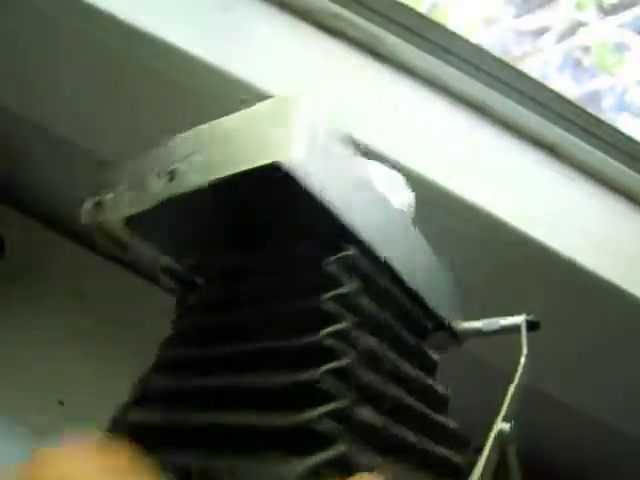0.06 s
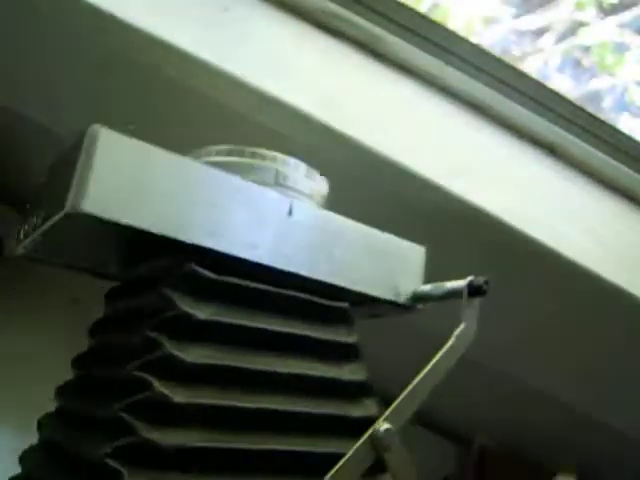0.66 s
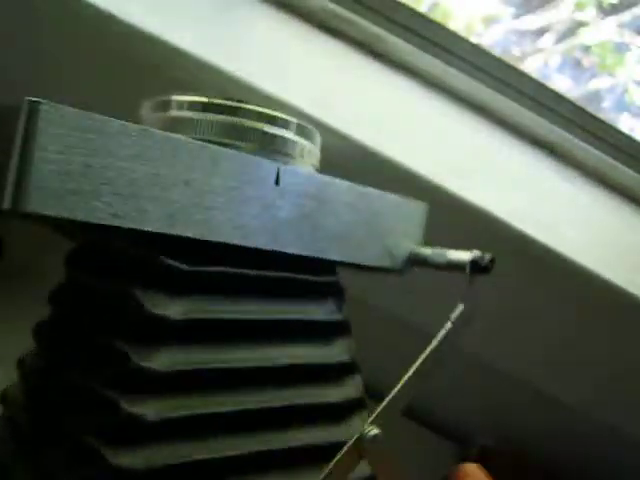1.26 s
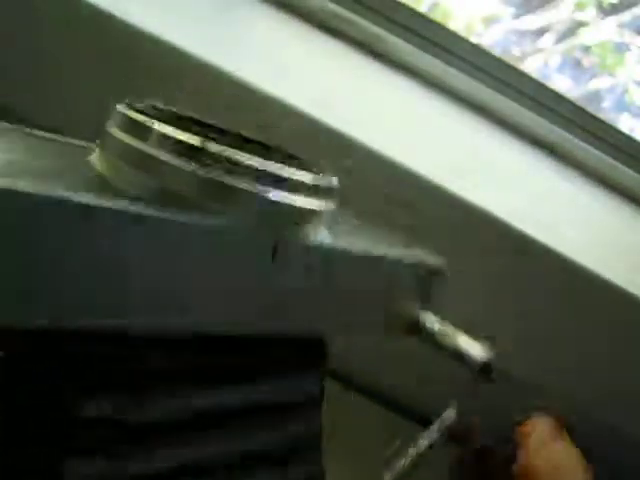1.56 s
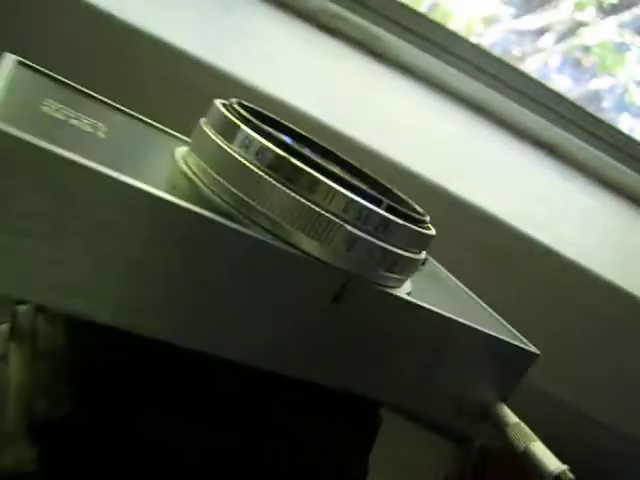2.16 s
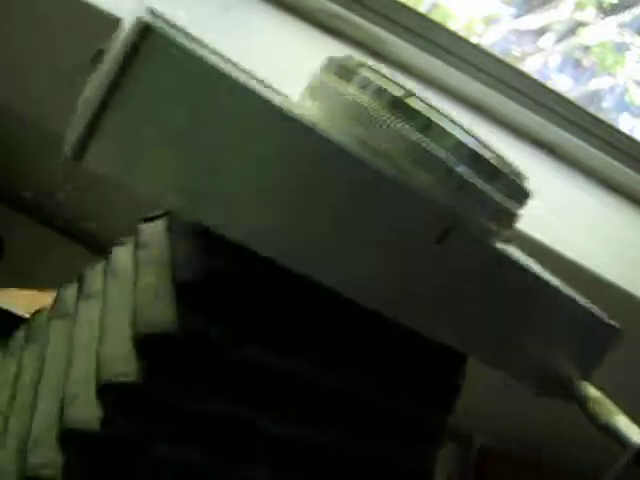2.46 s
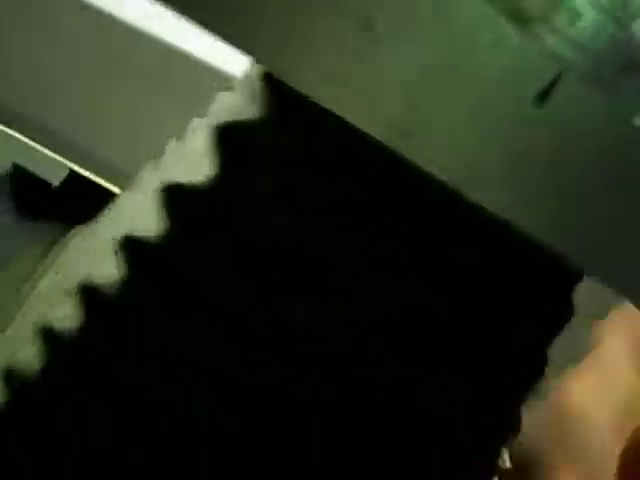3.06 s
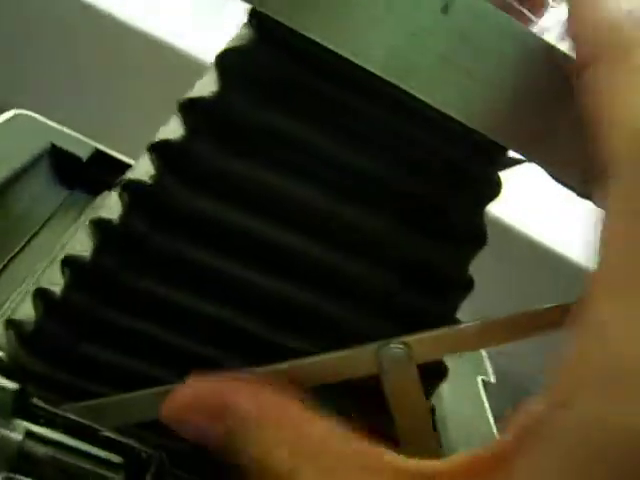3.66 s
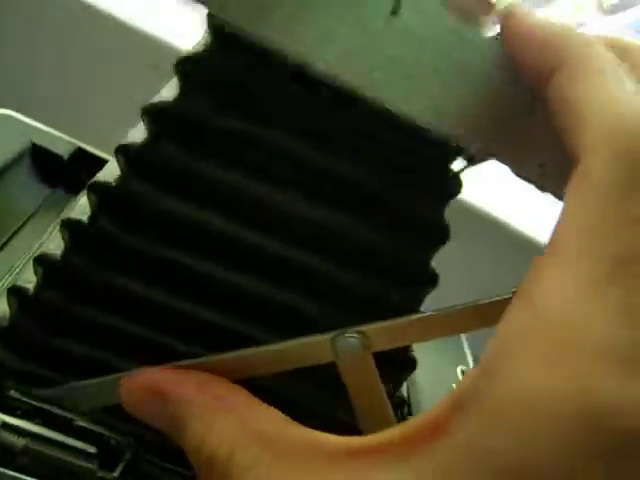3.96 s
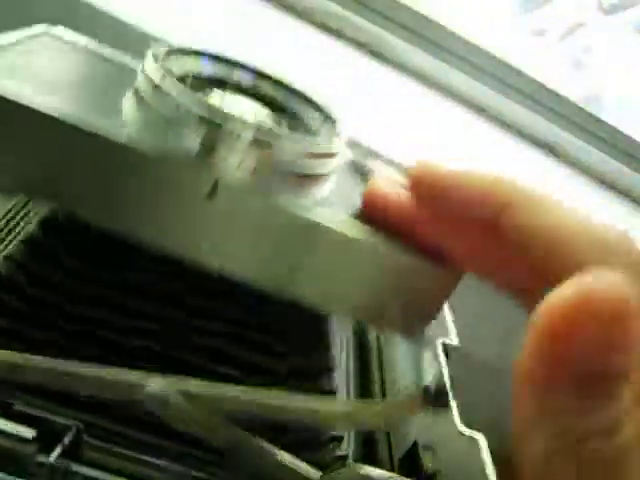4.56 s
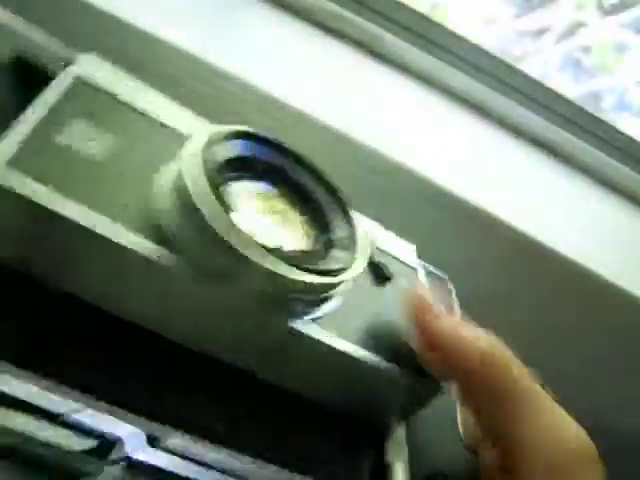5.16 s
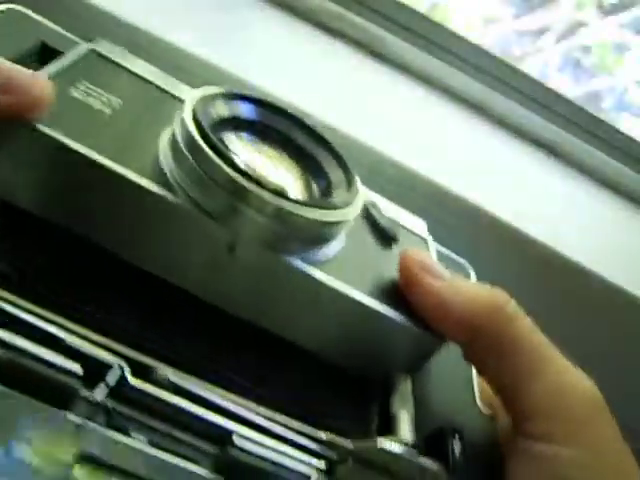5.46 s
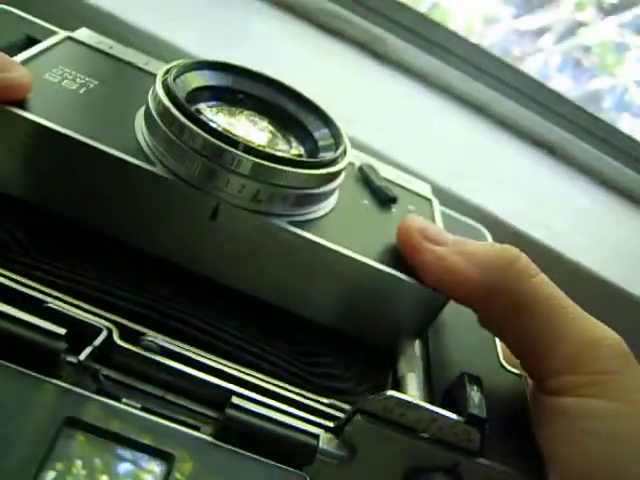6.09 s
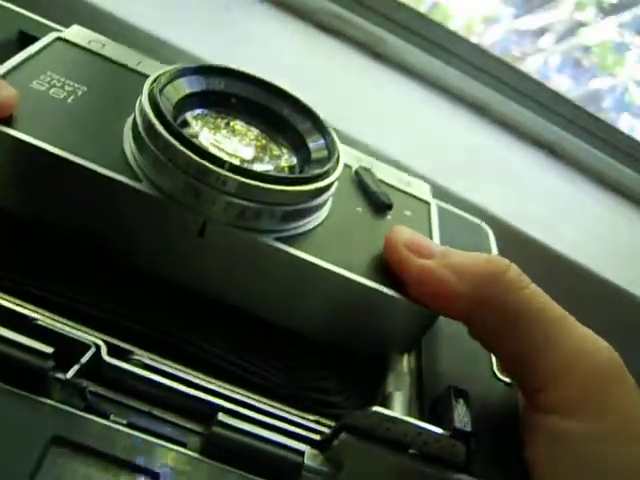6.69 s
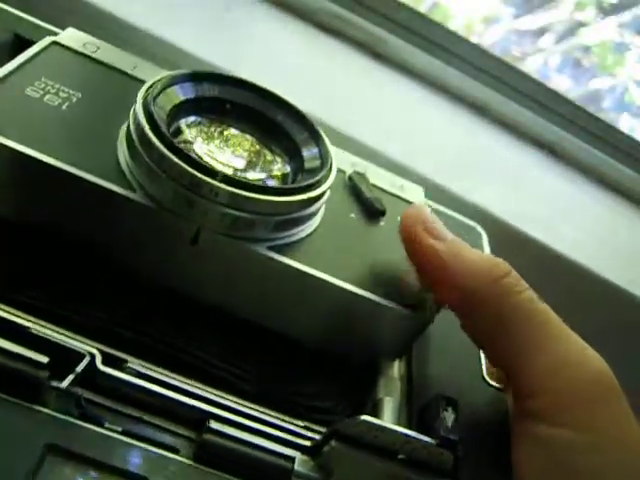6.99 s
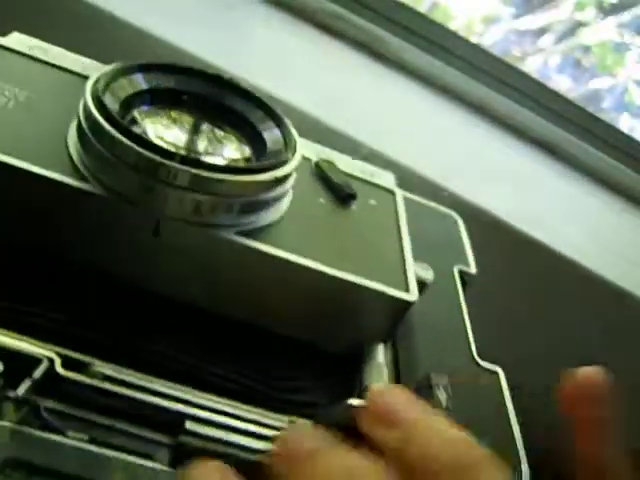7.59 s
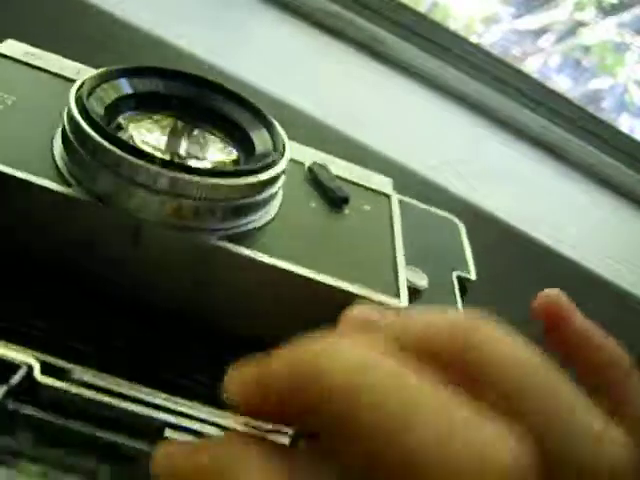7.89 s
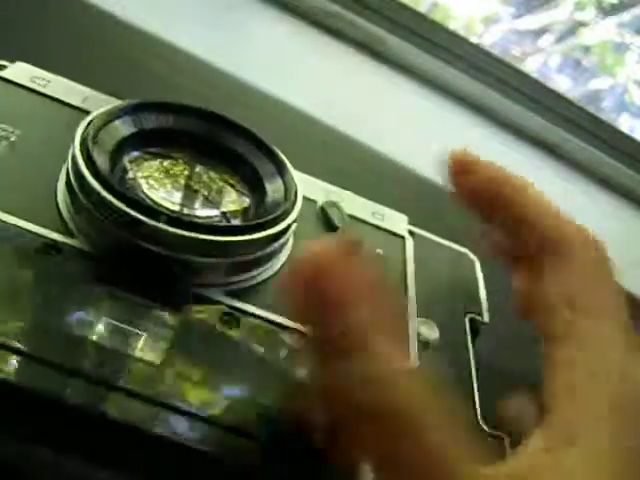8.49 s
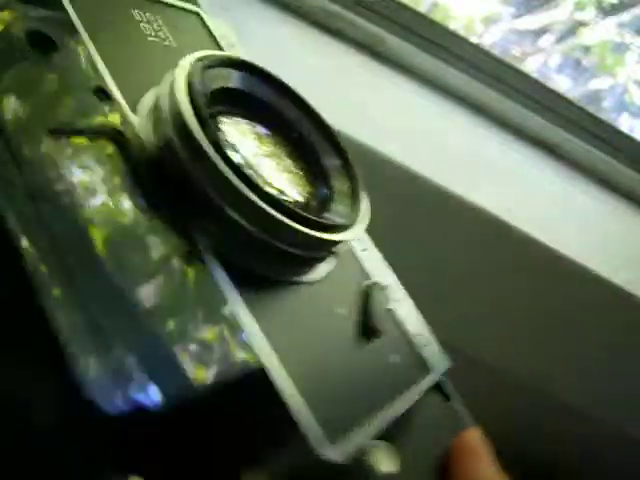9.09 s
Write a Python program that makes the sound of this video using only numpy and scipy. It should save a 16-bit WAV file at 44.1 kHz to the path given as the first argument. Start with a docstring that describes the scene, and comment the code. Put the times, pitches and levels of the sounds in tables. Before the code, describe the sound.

An old folding camera is handled close to the microphone in a small room, over faint steady hiss. A few light metal clicks and a dull bump come in the first second and a half. From 2 to 3.3 seconds the clicks grow busier, mixed with small hollow knocks, a brief high squeak near 2.4 and a sharp, scraping click near 3.1. A loud snap at 4 seconds leads into soft metal sliding, and the hiss dips for a while. Lighter clicks, short scrapes and tiny spring pings follow from 4.8 to 5.8. A lull with a faint low hum lasts until small clicks return at 7.3. At 7.8 a hard snap comes with a knock, a short rattle and a thin ping. Smaller clicks fall near 8.4 and 8.8, then the front snaps shut with a hollow knock at 9.3.

```python
"""In a small room, an old folding camera is handled close to the microphone.
Its struts, catches and front plate click by impact, and its hollow housing knocks in damped low modes.
As the bellows fold in, metal slides on metal with stick-slip friction; a dry joint squeals, loose parts
rebound, a small spring pings, and the front snaps shut. Behind it lie hiss and a faint hum, which sink
after two of the hardest snaps and creep back."""
import sys
import numpy as np
from scipy import signal
from scipy.fft import rfft, irfft, next_fast_len
from scipy.io import wavfile

SR = 44100
rng = np.random.default_rng(int(sys.argv[2]) if len(sys.argv) > 2 else 0)


def generate_wav(signal):
    """Clip the signal to [-1, 1] and save it as 16-bit WAV at the path in sys.argv[1]."""
    frames = np.transpose(np.atleast_2d(signal))
    scaled = np.clip(frames, -1, 1) * 32767
    pcm = np.round(scaled).astype(np.int16)
    wavfile.write(sys.argv[1], SR, pcm)


N = 411894


def from_db(db):
    """Amplitude ratio of a level in decibels."""
    return 10 ** (np.asarray(db) / 20)


def rms_one(x):
    """Normalisation to unit mean power."""
    return x / np.sqrt(np.mean(x ** 2) + 1e-20)


def energy_one(x):
    """Normalisation to unit total energy."""
    return x / np.sqrt(np.sum(x ** 2) + 1e-20)


def add(out, start_s, sound):
    """Superposition: a sound adds to the mix from its onset."""
    i = min(max(round(start_s * SR), 0), N)
    out[i:i + len(sound)] += sound[:N - i]


def band(x, low, high):
    """Causal band-pass filtering between two frequencies in Hz."""
    return signal.sosfilt(signal.butter(3, [low, high], "band", fs=SR, output="sos"), x)


def resonate(x, hz, width):
    """Forced response of a damped oscillator, with unit gain at resonance."""
    r = np.exp(-np.pi * width / SR)
    feedback = [1, -2 * r * np.cos(2 * np.pi * hz / SR), r * r]
    return signal.lfilter(np.array([1, 0, -1]) * (1 - r * r) / 2, feedback, x)


def coloured(spectrum):
    """Spectral shaping of white noise, at unit rms."""
    hz, db = np.transpose(spectrum)
    size = next_fast_len(N)
    bins = np.maximum(np.fft.rfftfreq(size, 1 / SR), 1)
    gain = from_db(np.interp(np.log(bins), np.log(hz), db))
    return rms_one(irfft(rfft(rng.standard_normal(size)) * gain, size)[:N])


# hiss before and after folding: (frequency [Hz], relative spectral level [dB])
HISS_OPEN = [(15, -35), (25, -0.5), (81, -7), (143, -6.5), (174, -6.5), (356, -5), (391, -6), (712, -9),
             (904, -7), (1180, -10.5), (1530, -10), (1770, -12.5), (3450, -15.5), (6430, -18),
             (7600, -18.5), (9880, -13), (16700, -120)]
HISS_FOLDED = [(15, -51), (25, -5.5), (49, -2), (85, -10), (118, -8.5), (162, -8.5), (210, -10), (308, -8),
               (452, -11), (497, -10.5), (712, -14), (783, -9.5), (1070, -13.5), (6910, -22), (7600, -22),
               (9880, -14.5), (16700, -120)]
# envelope of the hum: (time [s], level re hiss [dB])
HUM_ENVELOPE = [(6.2, -24), (6.5, -12), (8.5, -12.5), (8.9, -21)]
# dips of the background after hard snaps: (time [s], depth [dB], hold [s])
BACKGROUND_DIPS = [(3.983, 10.5, 2.086), (7.82, 8, 0.86)]

def background(level_db=-40, hum_hz=118.5, waver_db=3.5, wander_rad=1.4, sink_s=.012, recover_s=.6):
    """Modulation: a hum wavers in level and phase over hiss; both dip and recover exponentially."""
    t = np.arange(N) / SR
    folded = np.clip((t - 3.95) / .1, 0, 1)   # equal-power crossfade
    hiss = np.sqrt(1 - folded) * coloured(HISS_OPEN) + np.sqrt(folded) * coloured(HISS_FOLDED)
    knots = np.linspace(0, t[-1], 110)
    swell, drift = [np.interp(t, knots, rng.standard_normal(len(knots))) for _ in range(2)]
    hum_db = np.interp(t, *np.transpose(HUM_ENVELOPE)) + waver_db * swell
    hum = np.sqrt(2) * np.sin(2 * np.pi * hum_hz * t + wander_rad * drift) * from_db(hum_db)
    dip_db = 0
    for start, depth, hold in BACKGROUND_DIPS:
        sinking = np.clip((t - start) / sink_s, 0, 1)
        dip_db += depth * sinking * np.exp(-np.maximum(t - start - hold, 0) / recover_s)
    return from_db(level_db - dip_db) * (hiss + hum)


def chatter(t, length, t60=.013, first_blow=5.4, grain_db=2.5):
    """Contact force: an impulse, then dense tiny re-contacts that die away at once."""
    recontacts = rng.standard_normal(len(t)) * from_db(grain_db * rng.standard_normal(len(t)))
    force = recontacts * from_db(-60 * np.maximum(t - length, 0) / t60)
    force[0] += first_blow * rng.choice([-1, 1])
    return force


def coupled_modes(x, hz, width, share):
    """Energy transfer: a share of the sound passes to two coupled modes, which swell and ring out."""
    share = np.clip(share, 0, 1)
    ring = energy_one(resonate(resonate(x, hz, width), hz, width))
    return energy_one(np.sqrt(1 - share) * energy_one(x) + np.sqrt(share) * ring)


# impacts of metal parts; hardness is clink re knock, edge is tick re clink:
# (time [s], chatter length [s], knock level [dB], hardness [dB], edge [dB], plate [Hz], strut [Hz])
METAL_IMPACTS = [(0.339, .007, -40, 0.5, -13, 1530, 3860), (0.9354, 0.0018, -29, 6.5, -10.5, 1410, 3900),
                 (1.0237, 0.0029, -36.5, 0.5, -12, 1410, 3550), (1.1287, .0026, -43, -3, -11, 1390, 2820),
                 (1.291, .0036, -44.5, 3, -1.5, 1070, 4350), (2.1858, 0.0019, -25, -1.5, -5.5, 1570, 2660),
                 (2.3123, .0038, -35, -20, -2, 1260, 3170), (2.4965, 0.0027, -25.5, -15, 2.5, 1510, 2700),
                 (2.803, .0031, -33, -2, -16, 1340, 2520), (2.8197, .0012, -28.5, -23, -6, 950, 2520),
                 (2.942, .0035, -33.5, -5.5, -13, 2150, 4220), (3.137, 0.0041, -34, -2, -20, 1370, 2550),
                 (3.1433, 0.005, -21.5, 1.5, -11, 1290, 3260), (3.29, 0.0032, -48.5, 7.5, -2, 660, 2780),
                 (3.6427, .0071, -34, -6.5, -10, 1500, 2720), (3.9828, 0.0042, -15.5, 2.5, -8, 1085, 3410),
                 (4.768, 0.0019, -30, 7, -17, 1140, 2870), (4.7725, 0.0012, -31, 10.5, -11, 2060, 3940),
                 (5.0277, 0.0021, -47, 9.5, -1.5, 1740, 2720), (5.0697, 0.0024, -48.5, 12, -3, 1740, 4530),
                 (5.1303, 0.0064, -40.5, 1, -6, 700, 3380), (5.1453, 0.0012, -25.5, 4, -5, 2110, 3200),
                 (5.2385, .0068, -44, -5, -7, 1360, 4120), (5.484, 0.0076, -44, -4.5, -5, 1020, 4170),
                 (5.5484, 0.0028, -41, 4, -10, 790, 2980), (5.757, 0.0016, -43.5, 5, -7, 930, 3230),
                 (6.243, .013, -40, -5.5, -6.5, 730, 3000), (7.3018, .0027, -30, -14, -15, 740, 3140),
                 (7.6147, 0.0025, -40, 6, -6.5, 750, 3100), (7.67, 0.0025, -36, -7, 1, 1520, 4480),
                 (7.8226, 0.0015, -21.5, -4, -1.5, 1280, 3330), (7.8253, 0.0041, -21, 4.5, -3, 1390, 4130),
                 (8.125, 0.0021, -56, 8, -2, 1630, 4090), (8.2337, .003, -50, 1, -3, 1490, 3240),
                 (8.3558, .0018, -32.5, -14, -1, 840, 3610), (8.7727, .0047, -38, -9, -7.5, 740, 3500),
                 (8.7962, 0.0019, -35, 0, -12, 710, 3680), (9.3005, .001, -30.5, 6.5, -15, 1800, 2600),
                 (9.3024, 0.006, -18.5, 4.5, -6, 810, 4120)]
# bands of thud, knock, clink and tick: (lower limit [Hz], upper limit [Hz])
IMPACT_BANDS = [(110, 620), (600, 2400), (2400, 5300), (5300, 8000)]
# natural modes of the frame: (frequency [Hz], level re driving band [dB], 60 dB decay time [s])
FRAME_MODES = [(773.5, -15.5, 0.098), (1088, -13.5, .07), (1520, -12.5, 0.056), (1752, -18, 0.068),
               (2060, -25.5, 0.11), (3357, -12, 0.016), (3670, -22.5, 0.041), (4090, -24.5, 0.053),
               (4260, -29, .06), (5540, -24, .06), (6600, -14.5, 0.031), (6500, -17, 0.047)]

def impacts(rows, mode_spread_db=2.5):
    """Impact excitation: each blow rings the case, a hand-damped plate and strut, and the frame."""
    out, t = np.zeros(N), np.arange(SR // 8) / SR
    for start, length, knock_db, hardness_db, edge_db, plate_hz, strut_hz in rows:
        force = chatter(t, length)
        thud, knock, clink, tick = [energy_one(band(force, low, high)) for low, high in IMPACT_BANDS]
        hollow_case = from_db(-21) * energy_one(resonate(force, hz=940, width=79))
        # harder contacts give less plate resonance and less thud
        knock = coupled_modes(knock + hollow_case, plate_hz, width=300, share=.51 - .1 * hardness_db)
        thud_db = -15.5 - .32 * hardness_db
        clink = coupled_modes(clink, strut_hz, width=430, share=.18)
        levels_db = knock_db + np.array([thud_db, 0, hardness_db, hardness_db + edge_db])
        gains = from_db(levels_db) * np.sqrt(SR / 100)   # levels are energy spread over 10 ms
        hit = sum(gain * part for gain, part in zip(gains, (thud, knock, clink, tick)))
        for hz, db, t60 in FRAME_MODES:
            drive = gains[sum(hz > high for _, high in IMPACT_BANDS[:-1])]   # the band the mode lies in
            strength = from_db(db + mode_spread_db * rng.uniform(-1, 1)) * rng.choice([-1, 1])
            hit += drive * strength * energy_one(np.sin(2 * np.pi * hz * t) * from_db(-60 * t / t60))
        add(out, start, hit)
    return out


# knocks of the housing: (time [s], level [dB], frequency [Hz], 60 dB decay time [s])
HOUSING_KNOCKS = [(0.731, -28, 220, .03), (2.0028, -28.5, 260, 0.023), (2.186, -28.5, 300, 0.028),
                  (2.312, -27, 202, .036), (2.804, -26.5, 420, .025), (2.843, -25, 454, .049),
                  (2.861, -29, 200, .04), (2.8612, -28, 535, .03), (7.8245, -18.5, 718, .055),
                  (8.7963, -28, 424, 0.034), (9.212, -40, 50, .12), (9.262, -35, 42, .2),
                  (9.302, -16.5, 404, .03), (9.304, -26, 55, .12), (9.322, -21, 265, 0.081),
                  (9.334, -20.5, 240, 0.073)]

def housing():
    """Damped vibration: a bump of the hand or the front slamming home rings a low mode of the housing."""
    out, t = np.zeros(N), np.arange(SR // 4) / SR
    for start, db, hz, t60 in HOUSING_KNOCKS:
        add(out, start, from_db(db - 60 * t / t60) * np.sin(2 * np.pi * hz * t))
    return out


# strokes of metal on metal: (time of peak [s], release [s], level [dB], squeak re body [dB])
SLIDE_STROKES = [(2.422, 0.12, -36.5, 9), (3.18, 0.065, -34, 2), (4.015, 0.26, -45.5, -17),
                 (4.15, 0.06, -42.5, -4.5), (4.26, .42, -48.5, -10), (4.44, 0.25, -50, -4),
                 (4.76, 0.13, -42.5, -12), (5.174, 0.14, -46, -2), (5.29, 0.1, -48, -1),
                 (7.338, .1, -45.5, -6), (7.865, 0.036, -37, 2), (8.376, 0.024, -44, -12),
                 (8.792, 0.05, -43, -3), (9.116, .064, -45, 5), (9.325, .05, -37, -4)]
# dull plate modes and bright strut modes: (frequency [Hz], bandwidth [Hz], relative gain [dB])
PLATE_MODES = [(780, 190, -6), (1000, 200, -4.5), (1370, 230, -10), (1680, 200, -7), (3460, 1040, -14.5)]
STRUT_MODES = [(4200, 560, -6.5), (4750, 390, -4), (5000, 190, -9.5), (6230, 110, -4.5),
               (6600, 1800, -14.5)]

def slides(attack_s=.035, grain_db=7.0):
    """Sliding friction: tiny random slips drive the plates and struts as each stroke swells and fades."""
    out = np.zeros(N)
    for peak, release, db, squeak_db in SLIDE_STROKES:
        t = np.arange(-attack_s, release, 1 / SR)
        slips = rng.standard_normal(len(t)) * from_db(grain_db * np.minimum(rng.exponential(1, len(t)), 4))
        body, squeak = modal_response(slips, PLATE_MODES), modal_response(slips, STRUT_MODES)
        stroke = np.interp(t, [-attack_s, 0, release], [0, 1, 0])
        add(out, peak - attack_s, from_db(db) * stroke * rms_one(body + from_db(squeak_db) * squeak))
    return out


def modal_response(force, modes):
    """Modal superposition: resonances of alternating polarity, summed and scaled to unit rms."""
    rings = [from_db(db) * resonate(force, hz, width) for hz, width, db in modes]
    return rms_one(sum((-1) ** k * ring for k, ring in enumerate(rings)))


# squeal of a dry joint: (start [s], time of peak [s], end [s], level [dB])
JOINT_SQUEALS = [(2.409, 2.427, 2.455, -36)]
# modes of the joint: (frequency [Hz], bandwidth [Hz], relative level [dB])
JOINT_MODES = [(4780, 90, 1), (6210, 70, -2)]

def dry_joint():
    """Stick-slip friction: a dry joint sings in two narrow modes."""
    out = np.zeros(N)
    for start, peak, end, db in JOINT_SQUEALS:
        t = np.arange(start, end, 1 / SR)
        slips = rng.standard_normal(len(t))
        song = sum(from_db(level) * rms_one(resonate(slips, hz, width))
                   for hz, width, level in JOINT_MODES)
        add(out, start, from_db(db) * np.interp(t, [start, peak, end], [0, 1, 0]) * rms_one(song))
    return out


# rattles of loose parts: (time [s], first gap [s], knock level [dB], loss per bounce [dB],
# hardness [dB], edge [dB], plate [Hz], strut [Hz])
LOOSE_PARTS = [(3.17, 0.026, -41, 3.5, 7.5, -4, 1030, 4450), (4.797, .023, -32, 17, 2, -11, 2290, 2660),
               (7.319, 0.022, -36.5, -1, -8, -9, 740, 3420),
               (7.8456, .0136, -35.5, 2.5, 8.5, -4.5, 1490, 4670),
               (8.3595, .0102, -33, 2, 2, -6, 1300, 3900)]

def rebounds(count=3, gap_ratio=.75, chatter_s=.0017):
    """Inelastic bouncing: rows of impacts that follow ever sooner and, in most rattles, weaker."""
    rows = []
    for time, gap, db, loss_db, *timbre in LOOSE_PARTS:
        for k in range(count):
            rows.append((time, chatter_s, db - k * loss_db, *timbre))
            time += gap * gap_ratio ** k
    return rows


# pings of a small spring: (time [s], level [dB])
SPRING_PINGS = [(5.028, -47), (5.071, -38), (7.614, -47), (7.672, -45), (7.872, -35)]

def spring(hz=4450, t60=.072):
    """Free vibration: after the catches slip, a spring rings thinly in one decaying mode."""
    out, t = np.zeros(N), np.arange(SR // 4) / SR
    for start, db in SPRING_PINGS:
        add(out, start, from_db(db - 60 * t / t60) * np.sin(2 * np.pi * hz * t))
    return out


def room(x, first_echo_s=.003, recess_db=-12, recess_t60=.066, tail_db=-23, tail_t60=.26):
    """Reverberation: quick reflections from the window recess and a faint diffuse tail from the room."""
    t = np.arange(SR // 2) / SR
    response = 0
    for db, t60 in ((recess_db, recess_t60), (tail_db, tail_t60)):
        echoes = rng.standard_normal(len(t)) * from_db(-60 * t / t60) * (t > first_echo_s)
        response += from_db(db) * energy_one(echoes)
    return x + signal.fftconvolve(x, response)[:N]


def scene():
    """Superposition of the reverberant metal sounds, the direct housing knocks and the background."""
    metal = impacts(METAL_IMPACTS + rebounds()) + slides() + dry_joint() + spring()
    return (room(metal) + housing() + background())[None]


def record(dry, ceiling=.8, shelf_hz=7450, shelf_drop_db=19, cutoff_hz=8700):
    """Saturation and band limiting: peaks are rounded, the treble drops to a low shelf and is then cut."""
    rounded = ceiling * np.tanh(dry / ceiling) * signal.windows.tukey(N, .0006)
    shelved = signal.sosfilt(signal.ellip(5, .3, shelf_drop_db, shelf_hz, fs=SR, output="sos"), rounded)
    return signal.sosfilt(signal.cheby1(12, .2, cutoff_hz, fs=SR, output="sos"), shelved)


dry = scene()
out = record(dry)
generate_wav(out)
```